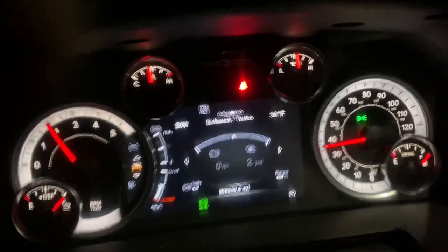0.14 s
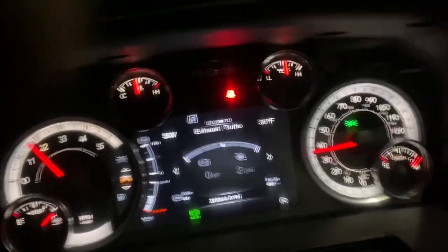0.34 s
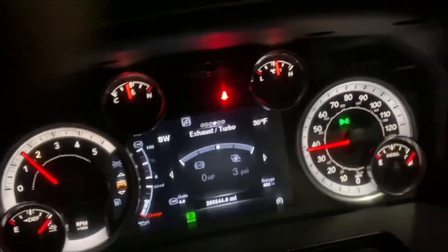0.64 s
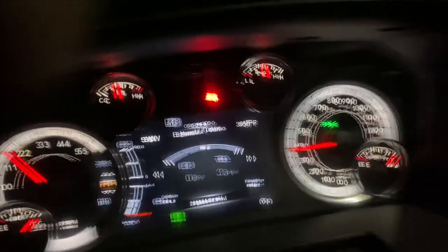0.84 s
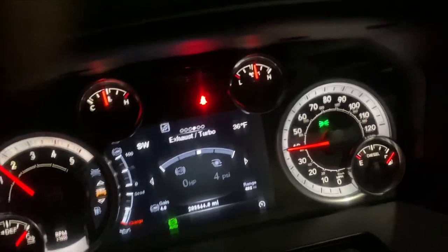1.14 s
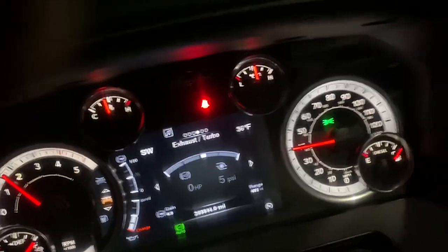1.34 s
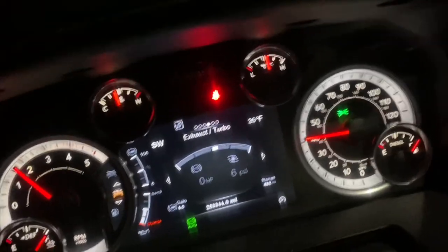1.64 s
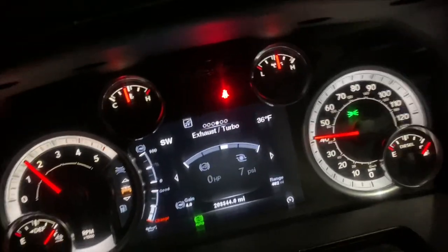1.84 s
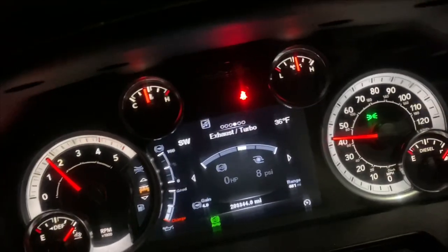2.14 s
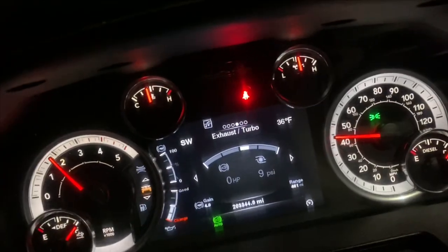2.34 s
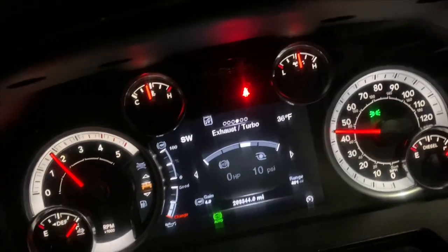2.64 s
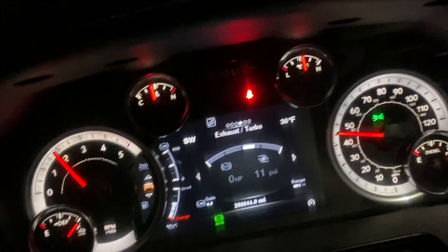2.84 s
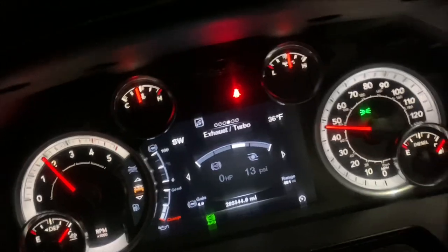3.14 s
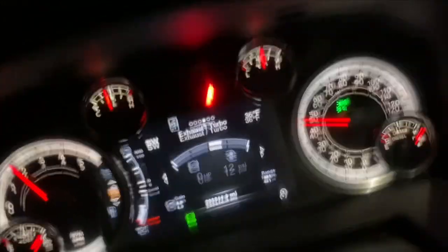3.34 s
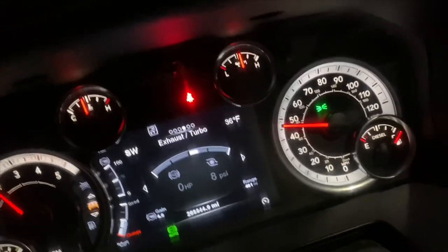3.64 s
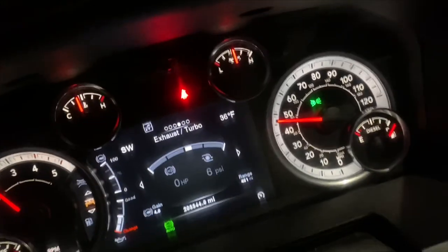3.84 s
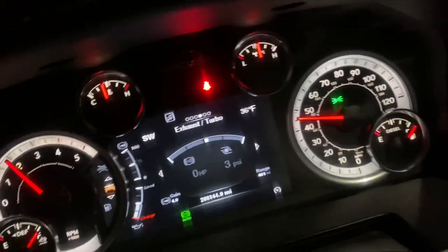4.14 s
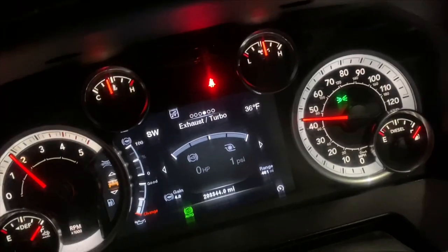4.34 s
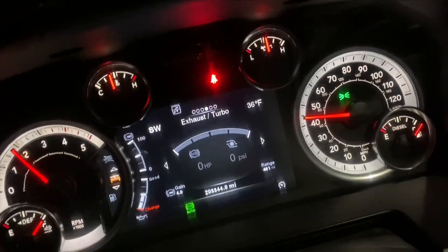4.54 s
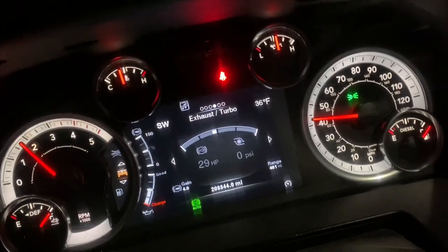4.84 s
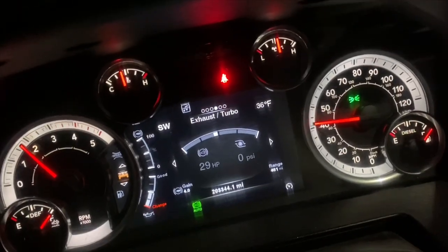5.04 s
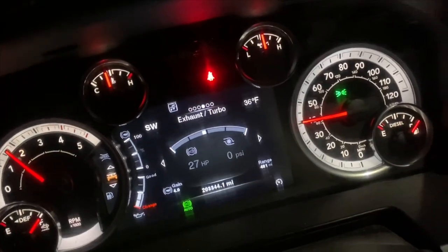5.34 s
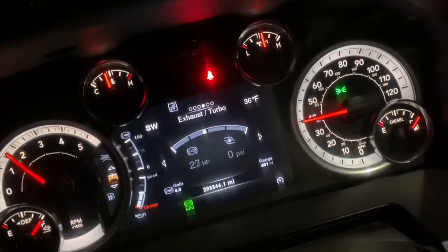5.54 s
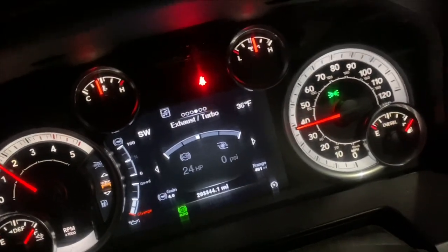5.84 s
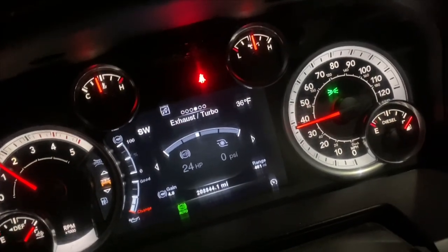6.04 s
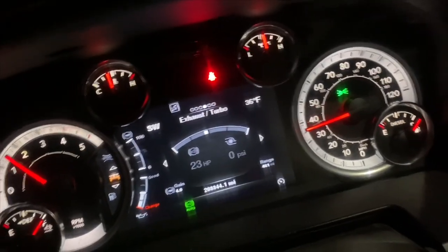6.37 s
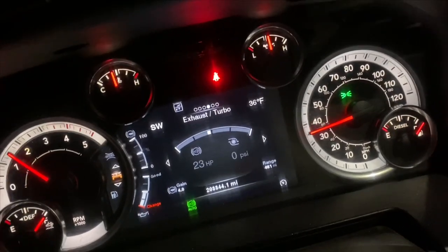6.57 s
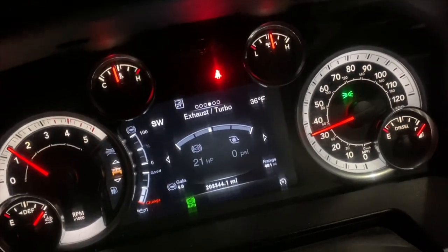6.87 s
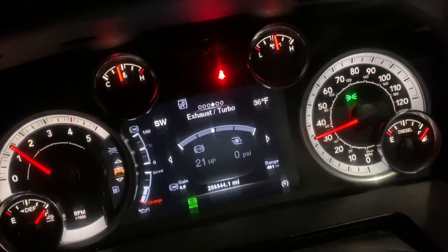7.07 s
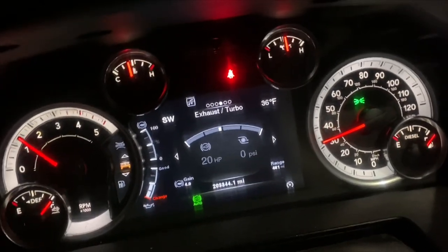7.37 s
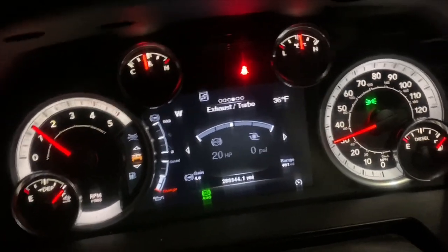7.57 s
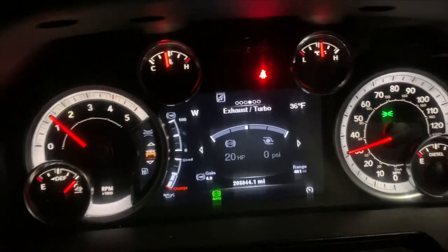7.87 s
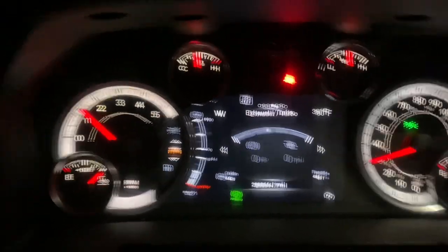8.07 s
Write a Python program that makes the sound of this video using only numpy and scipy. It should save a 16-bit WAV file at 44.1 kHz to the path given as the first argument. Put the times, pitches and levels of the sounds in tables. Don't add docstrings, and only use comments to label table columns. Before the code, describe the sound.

Stereo microphones in a truck's cab hear low road rumble and a booming diesel drone slowly rising, with clatter and a thin fluttering whistle above. After about three seconds comes a hard pedal clack with a light bounce. The drone drops away, then a rough, resonant exhaust-brake growl swells quickly and slides downward with extra hiss. It cuts off late, leaving quieter engine and road noise, with panel taps and creaks throughout.

```python
import sys
import numpy as np
from scipy import signal
from scipy.io import wavfile
from scipy.ndimage import uniform_filter1d, map_coordinates

SR = 44100
rng = np.random.default_rng(int(sys.argv[2]) if len(sys.argv) > 2 else 0)


def store_pcm(level_fs):
    pcm = np.round(np.clip(level_fs, -1, 1) * 32767).astype(np.int16)
    wavfile.write(sys.argv[1], SR, np.atleast_2d(pcm).T)


def boost_factor(decibels):
    exponent = np.asarray(decibels, float) / 20
    return 10 ** exponent


N = 362061

# time_s, level_db
EFFORT = [(0, -2.5), (1.2, -2.5), (1.4, -0.5), (1.75, -2), (2.0, -.5), (2.6, 0), (3.2, .5), (4.1, -1.5),
          (4.3, -3), (4.7, -4.5), (5.7, -5), (6.35, -6.5), (6.75, -5), (7.33, -7), (7.45, -7.5), (8.21, -8)]
CLATTER_DB = -32.5
BRAKE_ON_S, BRAKE_BUILD_S, BRAKE_OFF_S, BRAKE_DUMP_S, BRAKE_DB = 3.72, 0.16, 7.34, 0.034, -0.5


def read(points, hz):
    point_hz, value = np.transpose(points)
    return np.interp(np.log(hz + 1), np.log(point_hz + 1), value)


def over_time(rows, t):
    time_s, value = np.transpose(rows)
    return np.interp(t, time_s, value)


def swells(rows, t):
    return sum(db * np.exp(-((t - s) / half_s) ** 2) for s, half_s, db in rows)


def evened(x):
    return x / np.sqrt(np.mean(x ** 2) + 1e-20)


def wander(hz):
    knots = evened(rng.standard_normal(4000))
    steps = np.arange(0, N + 32, 32)
    curve = map_coordinates(knots, [steps / SR * hz * 2 + 3], order=3)
    return np.interp(np.arange(N), steps, curve)


def add(mix, s, sound):
    part = mix[..., round(s * SR):][..., :sound.shape[-1]]
    part += sound[..., :part.shape[-1]]


def noise(shape, size, patchy_db, flicker_db):
    # pitch_hz, likeness (held within 0 to 1)
    likeness = [(40, 1.7), (100, 0.53), (200, 0.73), (330, 0.17), (600, 0.68), (1100, 0.3641), (1550, 0.29),
                (2100, 0.28), (3000, 0.32), (4600, 0.56), (7500, 0.57), (8300, 0.6), (9800, 0.2),
                (10700, 0.5), (12100, 0), (16000, -2)]
    # pitch_hz, lead_radians
    lead_curve = [(20, 0.5), (340, 0.15), (600, 2.5), (1050, 3), (1500, 2.5), (2100, 6.5), (3400, 7.5),
                  (4600, 7), (6700, 3.5), (7750, 5), (8300, 2.5), (8800, 3.5), (10500, -1), (13200, -1.5)]
    # pitch_hz, difference_db
    tilt_curve = [(100, -1), (300, 1), (600, 4), (1200, 2), (1800, -1.5), (2600, 2.5), (3800, 5),
                  (5500, 3.5), (8000, 0.5)]
    frames, hz = 4 * N // size + 5, np.fft.rfftfreq(size, 1 / SR)
    a, b, c, d, patches = rng.standard_normal((frames, len(hz), 5)).T
    patches = uniform_filter1d(patches, size=9, axis=0)
    patches = evened(uniform_filter1d(patches, size=9, axis=1))
    flicker = evened(uniform_filter1d(rng.standard_normal(frames), size=3))
    same = np.clip(read(likeness, hz), 0, 1)[:, None]
    delay = np.exp(-1j * read(lead_curve, hz))[:, None]
    left = a + 1j * b
    right = (same * left + np.sqrt(1 - same ** 2) * (c + 1j * d)) * delay
    tilt = boost_factor(read(tilt_curve, hz) / 2)[:, None]
    level = boost_factor(read(shape, hz)[:, None] + patchy_db * patches + flicker_db * flicker)
    spectrum = np.array([left * tilt, right / tilt]) * level
    return evened(signal.istft(spectrum, nperseg=size, noverlap=3 * size // 4)[1][:, :N])


def back_pressure(t):
    build = 1 - np.exp(-(np.maximum(t - BRAKE_ON_S, 0) / BRAKE_BUILD_S) ** 2)
    dump = np.exp(-(np.maximum(t - BRAKE_OFF_S, 0) / BRAKE_DUMP_S) ** 2)
    return BRAKE_DB + 20 * np.log10(build * dump + 1e-4)


def road_rumble(t):
    # pitch_hz, level_db
    colour = [(11, -58.5), (18, -39), (47, -0.5), (65, -2.5), (184, -11.5), (253, -13), (287, -14),
              (343, -24.5), (429, -43.5), (466, -26.5), (500, -48), (650, -74.5), (1100, -120)]
    # time_s, half_length_s, change_db
    bumps = [(0, 0.052, -24), (.4, 0.081, 0.5), (1.3, 0.19, -3.5), (1.78, 0.12, -2.5), (2.9, 0.068, -2.5),
             (3.13, 0.048, 2.5), (3.6, 0.24, 3.5), (4.55, 0.1, 0), (5.5, 0.23, 1.5), (5.88, 0.11, -4),
             (6.38, 0.056, -1), (6.65, .15, 1), (6.92, 0.081, -4)]
    level_db = -23.5 + 0.49 * over_time(EFFORT, t) + swells(bumps, t)
    return boost_factor(level_db + 4.5) * noise(colour, size=4096, patchy_db=0.5, flicker_db=0.26)


def air_gusts(t):
    # time_s, half_length_s, change_db
    gusts = [(0, 0.012, 4), (1.89, 0.035, 4), (2.56, 0.069, 6.5), (2.97, .04, 0.5), (3.04, 0.021, 4.5),
             (3.12, .03, 4), (4.03, 0.041, 0), (4.66, 0.025, 0), (5.5, 0.058, 3.5), (5.78, 0.033, 3.5),
             (7.33, .04, 1), (8.21, .02, 8)]
    return swells(gusts, t) + 1.5 * wander(hz=5.4)


def air_hiss(t, throb, gust_db):
    # pitch_hz, level_db
    hiss_colour = [(1800, -28.5), (2600, -2.5), (3100, -1), (3700, -3), (4600, -4), (5200, -4.5),
                   (5700, -7.5), (6700, -6.5), (8000, -11), (9500, -17)]
    # pitch_hz, level_db
    fizz_colour = [(6500, -30), (8200, 0), (9500, -1), (11000, -3), (12400, -5), (13500, -7), (14000, -11),
                   (14800, -12), (15700, -11), (16000, -40)]
    effort_db = over_time(EFFORT, t)
    shut = boost_factor(back_pressure(t) - BRAKE_DB)
    hiss_db = -53.5 + 1.42 * effort_db + 0.27 * gust_db + 2.5 * shut
    fizz_db = -58 + 2.12 * effort_db + gust_db + 5 * shut
    hiss = boost_factor(hiss_db + 5.5) * throb * noise(hiss_colour, size=256, patchy_db=1.57, flicker_db=-0.1)
    fizz = boost_factor(fizz_db + 3.5) * noise(fizz_colour, size=256, patchy_db=1.8, flicker_db=0.3)
    return hiss + fizz


def trim_ticks():
    # time_s, peak_db, centre_hz, fade_s (time to fall 60 dB)
    creaks = [(.168, -37, 7000, .04), (.628, -50, 10000, .04), (.853, -46, 5000, .03),
              (.985, -37, 7000, .04), (1.462, -48, 10500, .04), (2.287, -44, 5000, .03),
              (2.558, -43, 10500, .08), (3.2755, -24, 3500, .04), (3.992, -43, 5000, .03),
              (4.011, -40, 8000, .12), (4.174, -47, 10500, .03), (4.849, -50, 10500, .03),
              (4.968, -43, 5000, .04), (5.310, -48, 8000, .04), (5.498, -46, 5000, .04),
              (5.698, -49, 5000, .03), (6.203, -42, 5000, .04), (6.740, -47, 7000, .05),
              (6.820, -40, 6000, .04), (6.956, -50, 5000, .03), (7.322, -52, 10500, .05),
              (7.641, -47, 5500, .04), (8.015, -53, 4500, .03)]
    out, t = np.zeros((2, N)), np.arange(1500) / SR
    puffs = rng.standard_normal((len(creaks), 3, len(t)))
    for (s, peak_db, hz, fade_s), puff in zip(creaks, puffs):
        band = signal.butter(1, [.6 * hz, min(1.5 * hz, 15000)], "band", fs=SR)
        burst = evened(signal.lfilter(*band, puff[0] + .6 * puff[1:]))
        burst = burst * (1 - np.exp(-t / .0018))
        add(out, s - .001, boost_factor(peak_db - 60 * t / fade_s) * burst)
    return out


def loose_panel(t):
    # pitch_hz, fade_s (time to fall 60 dB), taps_per_s, level_db against the clatter
    settings = (1354, 0.0558, 21.5, -8)
    # time_s, peak_db
    loud_taps = [(3.155, -30), (3.408, -26.5), (3.4217, -28), (3.474, -30), (3.649, -34), (3.846, -30),
                 (3.9237, -29.5), (4.1545, -38), (4.968, -31.5), (5.3862, -33), (5.497, -30.5), (5.6, -33),
                 (6.3535, -32.5), (6.7391, -28.5), (6.8264, -32), (6.958, -33), (7.0289, -35), (7.18, -36),
                 (7.2604, -35), (7.3796, -36), (8.0127, -43), (8.1743, -52)]
    hz, fade_s, taps_hz, share_db = settings
    chance_db = 2.0 * rng.exponential(1, N).clip(0, 3)
    taps = boost_factor(CLATTER_DB + over_time(EFFORT, t) + share_db + chance_db)
    taps = taps * (rng.random(N) < taps_hz / SR)
    for s, peak_db in loud_taps:
        add(taps, s, boost_factor(np.array([peak_db + 1.5])))
    u = t[:3000]
    fade = boost_factor(-60 * u / fade_s)
    left = fade * (1 - np.exp(-u / 0.0027)) * np.sin(2 * np.pi * hz * u)
    right = fade * (1 - np.exp(-u / 0.0019)) * np.sin(2 * np.pi * hz * u - 1.6)
    return signal.oaconvolve(taps[None], np.array([left, right]), axes=1)[:, :N] * 2


def pedal():
    # pitch_hz, level_db, fade_s (time to fall 60 dB)
    modes = [(800, 0, .02), (920, -18, .012), (620, -5, .014), (430, -7, .02), (330, -7, .03),
             (1430, -24, .015)]
    # time_s, peak_db, thud_db
    hits = [
        (3.2751, -13, -30),
        (3.2763, -12, -40),
        (3.2785, -17, -2),
        (3.3692, -24, -30),
        (3.3715, -30, -8),
    ]
    out, t = np.zeros((2, N)), np.arange(3000) / SR
    ring = sum(boost_factor(db - 60 * t / fade_s) * np.sin(2 * np.pi * hz * t) for hz, db, fade_s in modes)
    ring = ring * (1 - np.exp(-t / .0003))
    angle = 2 * np.pi * 60 * t + 8.6 * (1 - np.exp(-t / .0075)) - .4
    thud = boost_factor(-60 * t / .15) * np.cos(angle) * (1 - np.exp(-t / .0006))
    for s, peak_db, thud_db in hits:
        add(out, s, boost_factor(peak_db) * ring * boost_factor([[1.5], [-1.5]]) + boost_factor(thud_db) * thud)
    return out


def turbo(t):
    # time_s, pitch_hz
    whistle = [(0, 5750), (1.2, 7010), (2.0, 8060), (2.6, 8770), (2.93, 9240), (3.06, 9160), (3.2, 8650),
               (3.5, 7280), (3.9, 5600)]
    # pitch_hz, level_db
    duct = [(5600, -76), (6150, -68), (7100, -66.5), (7500, -62), (7800, -57), (8450, -63), (8850, -53),
            (9240, -54)]
    hz = uniform_filter1d(over_time(whistle, t), size=4000)
    level_db = read(duct, hz) - 1 + 3.5 * wander(hz=40)
    level_db = np.where(t > whistle[-1][0], -120, level_db)
    angle = 2 * np.pi * np.cumsum(hz * (1 + .0055 * wander(hz=90))) / SR
    right_lag = np.interp(hz, [7900, 8300], [1.0, 2.1])
    return np.sqrt(2) * boost_factor(level_db) * np.array([np.cos(angle), np.cos(angle - right_lag)])


def engine_clatter(t, throb, gust_db):
    # pitch_hz, level_db
    colour = [(190, -21), (330, -14.5), (339, -7.5), (366, -7), (474, -15), (651, -9), (1050, -16),
              (1130, -19.5), (1360, -15.5), (1750, -28), (1990, -26.5), (2530, -35.5), (3050, -40.5),
              (3960, -62), (6710, -120)]
    level_db = CLATTER_DB + over_time(EFFORT, t) + 0.13 * gust_db
    return boost_factor(level_db + 5.0) * throb * noise(colour, size=1024, patchy_db=1.0, flicker_db=0.76)


def firing_rate(t):
    # time_s, firings_hz
    speed = [(0, 78.5), (.7, 82.1), (1.3, 85.6), (2.1, 91.2), (2.7, 95.6), (2.9, 96.3), (3.1, 96.4),
             (3.45, 97.9), (3.82, 91.1), (4.05, 91.8), (4.2, 90.4), (4.35, 90.7), (4.52, 88.3),
             (5.05, 83.5), (5.85, 76.6), (6.45, 71.8), (7.15, 67.4), (8.21, 62.8)]
    # start_s, swing_hz
    shudders = [
        (-.19, 13),
    ]
    firing_hz = uniform_filter1d(over_time(speed, t), size=2000)
    for s, swing_hz in shudders:
        fade = np.exp(-(t - s) / .36)
        firing_hz = firing_hz - swing_hz * fade * np.sin(2 * np.pi * 4.0 * np.maximum(t - s, 0))
    return firing_hz


def engine_tones(t, cycles, firing_hz):
    # time_s, level_db
    load = [(0, -5), (.11, -15.5), (.3, -13.5), (1.0, -12), (1.74, -11), (3.1, -13), (3.3, -20),
            (3.39, -37), (3.46, -21)]
    # multiple_of_cycle, level_db against the drone
    pull_orders = [(6, 0), (8, -21), (9, -25), (10, -24), (11, -28), (12, -16.5), (18, -30), (24, -36)]
    # pitch_hz, level_db
    mounts = [(110, 0), (140, -2), (157, 6), (170, 3), (185, -3), (200, -1), (400, 0)]
    # multiple_of_cycle, level_db
    brake_orders = [(6, -17), (9, -21), (12, -25), (13, -35), (15, -28.5), (17, -34.5), (18, -36),
                    (19, -41), (20, -50), (21, -32), (23, -40), (24, -42), (27, -37), (29, -48), (30, -47),
                    (33, -50)]
    # pitch_hz, level_db
    cab = [(100, -14.5), (135, -6.5), (155, -1), (175, -1), (190, -11), (222, 5.5), (240, 11.5), (258, 11),
           (275, 1.5), (310, 11.5), (330, -2), (362, 1), (400, -6)]
    # multiple_of_cycle, level_db
    gear_orders = [(25.7, -39), (42.8, -50), (51.3, -50)]
    # pitch_hz, level_db
    bulkhead = [(270, -6), (300, 0), (345, 4), (372, 2), (395, -7), (450, -10), (500, 0), (570, 0),
                (640, -12)]
    load_db = over_time(load, t) + 0.53 * wander(hz=6)
    load_db = load_db - 15.7 * np.clip((t - load[-1][0]) * 2, 0, 1)
    load_db = load_db + 8.0 * np.clip((t - BRAKE_OFF_S) * 10, 0, 1)
    pull = (pull_orders, load_db, mounts)
    brake = (brake_orders, back_pressure(t), cab)
    gears = (gear_orders, 0, bulkhead)
    out = np.zeros((2, N))
    for orders, drive_db, path in (pull, brake, gears):
        for order, db in orders:
            path_db = read(path, firing_hz * order / 6)
            level = boost_factor(drive_db + db + path_db + .7 * wander(hz=9))
            angle = 2 * np.pi * (order * cycles + rng.random()) + .05 * wander(hz=7)
            pan_db = (-1) ** (order // 3) * min(order / 12, 1) ** 2 * 0.57
            lead = 0.073 + 0.0087 * order * (order % 2)
            left, right = boost_factor(pan_db) * np.cos(angle + lead), boost_factor(-pan_db) * np.cos(angle - lead)
            out += np.sqrt(2) * level * np.array([left, right])
    return out


def scene():
    t = np.arange(N) / SR
    firing_hz = firing_rate(t)
    cycles = np.cumsum(firing_hz) / SR / 6
    throb = 1 + 0.054 * np.cos(2 * np.pi * 3 * cycles) + 0.05 * np.cos(2 * np.pi * 6 * cycles)
    gust_db = air_gusts(t)
    background = road_rumble(t) + air_hiss(t, throb, gust_db) + trim_ticks() + loose_panel(t)
    engine = engine_clatter(t, throb, gust_db) + engine_tones(t, cycles, firing_hz)
    return background + pedal() + turbo(t) + engine


def top_cut(x):
    return signal.sosfilt(signal.butter(12, 15800, fs=SR, output="sos"), x)


def record(dry):
    # part (0 sum, 1 difference), from_hz, to_hz, limit_db
    dropped = [(0, 7900, 9100, -85), (0, 12300, 12500, -82), (0, 12500, 12900, -72), (0, 12900, 14400, -70),
               (0, 14400, 15750, -86), (0, 15750, 22000, 0), (1, 10300, 11750, -70), (1, 13900, 15100, -86),
               (1, 15100, 22000, 0)]
    left, right = 1.67 * np.tanh(dry / 1.566)
    hz, _, z = signal.stft(np.array([left + right, left - right]) / 2, SR, nperseg=1024)
    for part, lo_hz, hi_hz, under_db in dropped:
        for start_hz in np.arange(lo_hz, hi_hz, 450):
            band = (hz >= start_hz) & (hz < min(start_hz + 450, hi_hz))
            power = uniform_filter1d((abs(z[part, band]) ** 2).mean(axis=0), size=3)
            slow_db = 10 * np.log10(uniform_filter1d(power, size=61) + 1e-14)
            chance = evened(uniform_filter1d(rng.standard_normal(len(power)), size=5))
            limit_db = under_db + .82 * (slow_db - slow_db.mean()) + 4.0 * chance
            z[part, band] *= power > boost_factor(limit_db) ** 2
    mid, side = signal.istft(z, SR, nperseg=1024)[1][:, :N]
    return top_cut(np.array([mid + side, mid - side]))


dry = scene()
out = record(dry)
store_pcm(out)
```